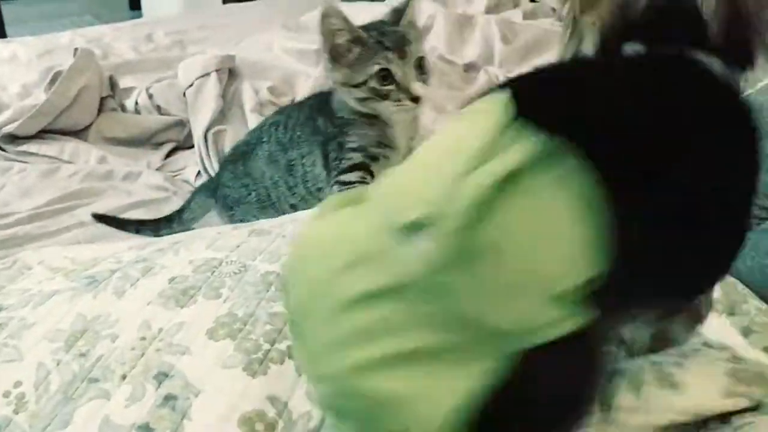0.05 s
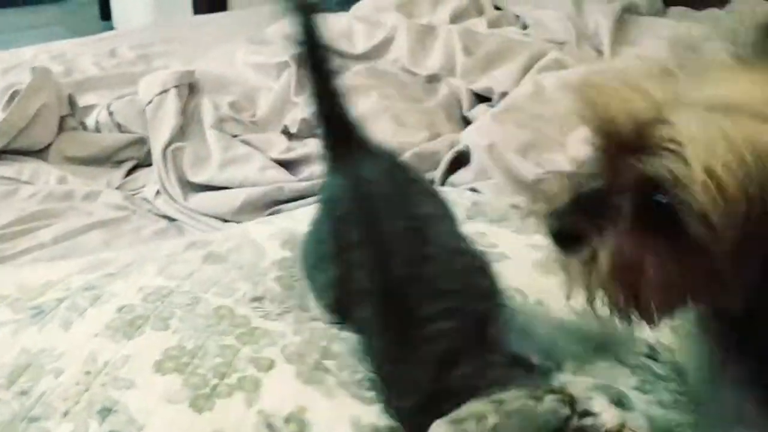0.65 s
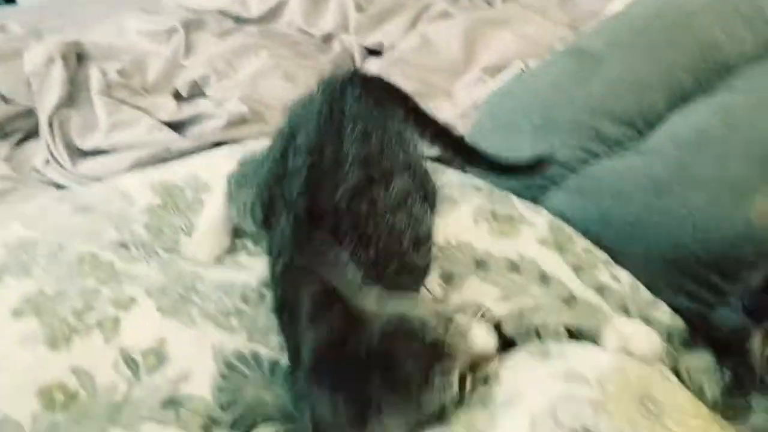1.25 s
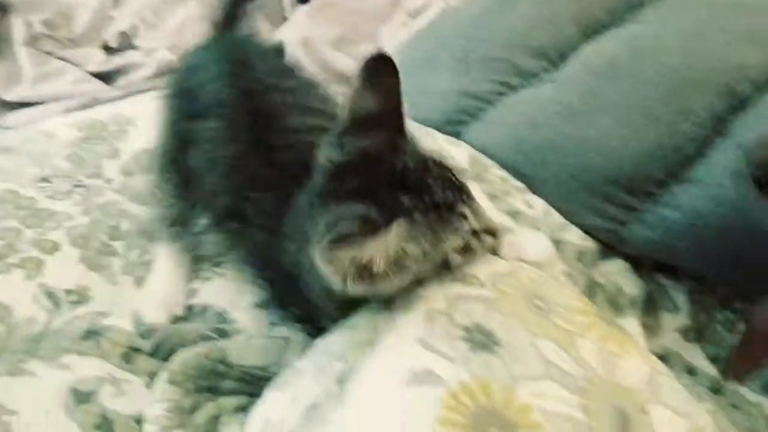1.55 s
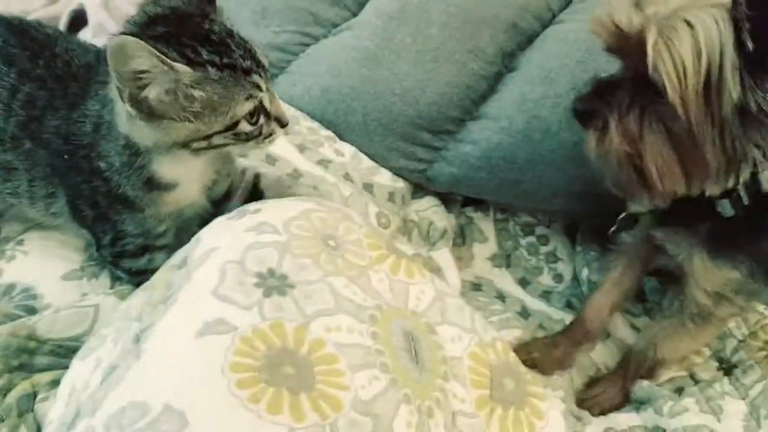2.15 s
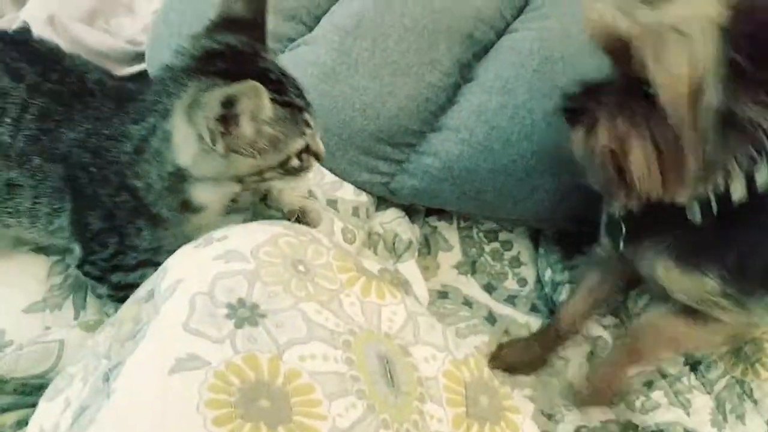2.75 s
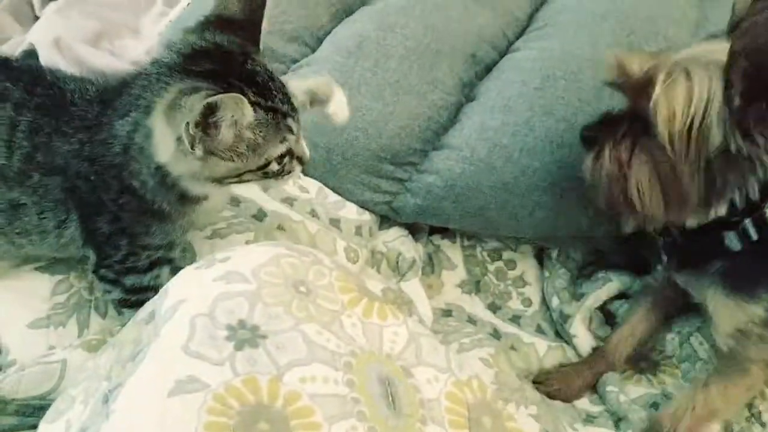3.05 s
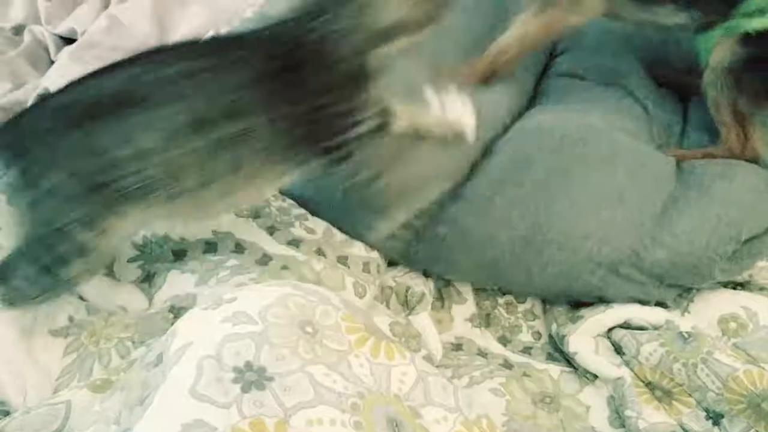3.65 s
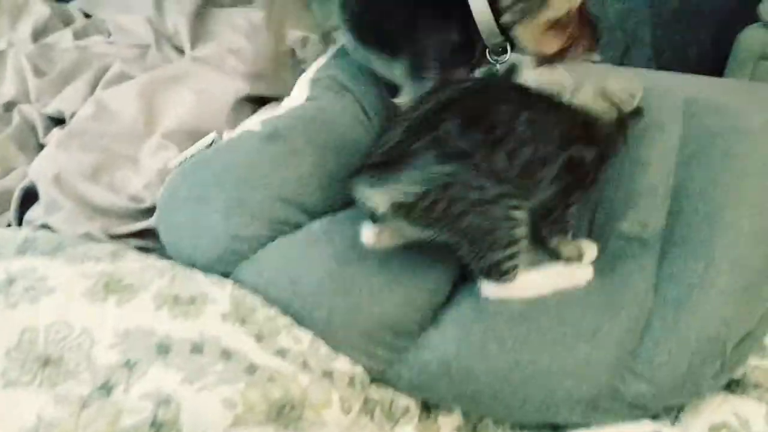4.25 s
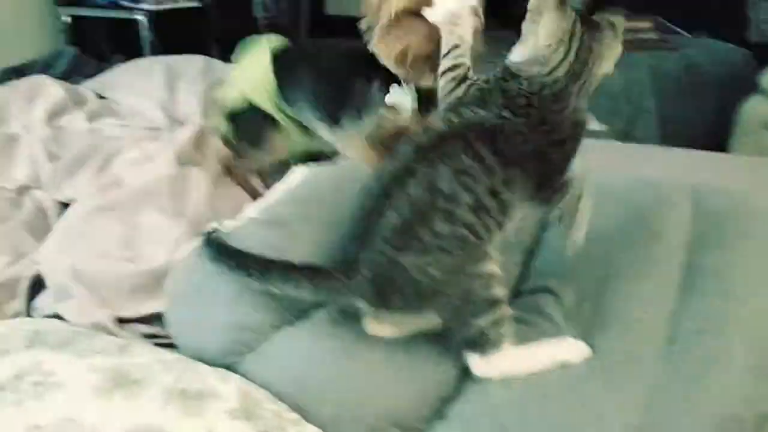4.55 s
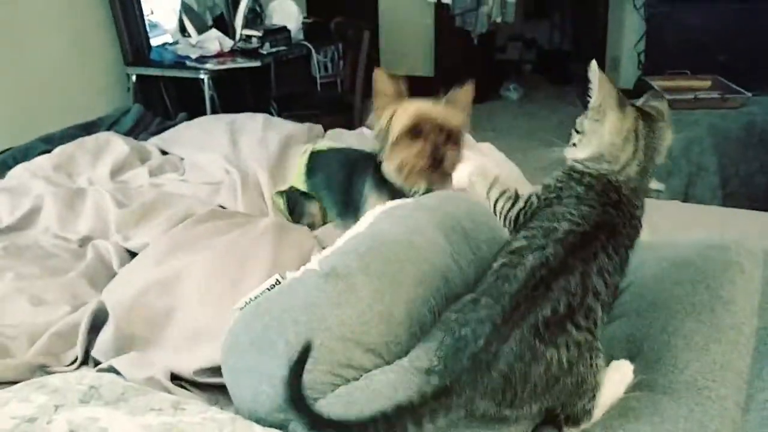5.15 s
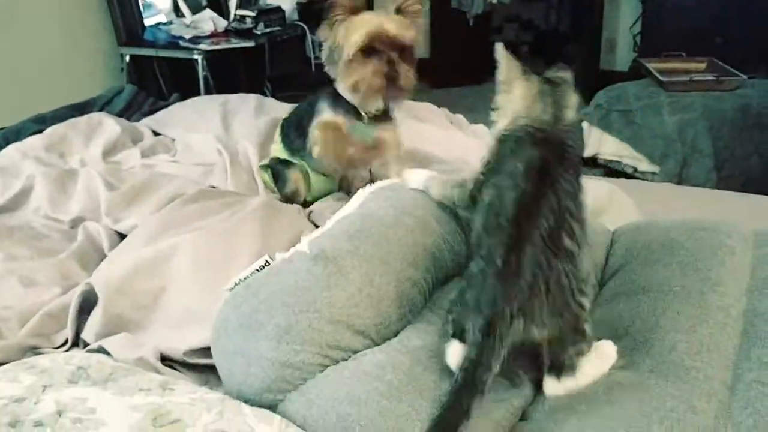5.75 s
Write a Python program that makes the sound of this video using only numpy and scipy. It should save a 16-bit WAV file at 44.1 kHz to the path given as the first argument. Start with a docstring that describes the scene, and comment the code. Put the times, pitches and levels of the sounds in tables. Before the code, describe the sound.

A small dog and a kitten scuffle on a quilt in a quiet bedroom, close to the microphone. Paws thump softly into the bedding, cloth swishes, and the metal tags on the dog's collar jingle with sharp little clicks. A lull of light steps and rustling follows over a faint hum. Then a second, longer flurry brings more thumps, swishes and jingles before the two settle.

```python
"""A bedroom, a phone's two microphones close to a small dog and a kitten on a quilt and padded pet bed.
They scuffle at once: paws thump into the bedding, cloth swishes, and the metal tags on the dog's collar
strike and jingle. From about 1.5 s comes a lull of light steps and rustling over the room's quiet hum.
Just after 3 s they lunge again, with more thumps, jingles and sharp clicks of the tags' split ring.
From 5 s they settle, with a last faint click and step."""
import sys
import numpy as np
from scipy import signal
from scipy.fft import rfft, irfft, next_fast_len
from scipy.io import wavfile
from scipy.ndimage import uniform_filter1d, map_coordinates

SR = 44100
rng = np.random.default_rng(int(sys.argv[2]) if len(sys.argv) > 2 else 0)


def inscribe(sig):
    """Save sig as 16-bit PCM at rate SR to the path in sys.argv[1].

    A 1-D sig is mono; a 2-D sig holds one channel per row.
    Samples are clipped to [-1, 1] before scaling.
    """
    pcm = np.round(np.clip(np.atleast_2d(sig).T, -1, 1) * 32767)
    wavfile.write(sys.argv[1], SR, pcm.astype(np.int16))


N = 264159

# The tags' three notes. Each row: mode frequency in Hz, level in dB, t60 in seconds.
LOW_MODES = [(5922, -2.5, .125), (8511, -13, .07), (9060, -15, .09)]
MIDDLE_MODES = [(6756, 0, .15), (6850, -19, .08), (15550, -21, .12)]
HIGH_MODES = [(12640, 0, .1), (12890, -16, .08), (10920, -23, .09), (15570, -22, .11)]
# Tags striking. Each row: start in seconds, low, middle and high note levels in dB,
# rattle length in seconds, left over right in dB.
TAG_CLINKS = [(.003, -58, -53.5, -49, .004, 0), (.149, -58, -52.5, -53, 0.0034, -2),
              (.164, -50.5, -56, -58, .003, 3), (.728, -62, -42, -41.5, .003, 3),
              (.749, -51, -37, -35.5, 0.024, 2.5), (.905, -45.5, -37.5, -56, 0.0022, 1),
              (1.0327, -48, -28, -34.5, 0.0067, 2), (1.07, -61, -35.5, -28, .028, 6),
              (1.121, -66, -37, -37.5, .022, 10.5), (1.1803, -50, -57, -42, .002, 1.5),
              (1.3088, -34, -45, -52, 0.0052, 0), (3.147, -39, -50, -40.5, .018, 1.5),
              (3.223, -70, -54, -32, 0.02, -5), (3.245, -70.5, -47, -19, .009, 1.5),
              (3.27, -37.5, -39, -26.5, .006, 4.5), (4.0195, -75, -65.5, -48, .003, 7),
              (4.064, -39.5, -54, -33.5, 0.011, 14), (4.32, -75, -70, -49.5, .003, 11),
              (4.41, -43, -68, -63, 0.024, 5), (4.825, -54, -43, -33, .004, 0),
              (4.834, -52, -39, -26, .008, 5), (4.8456, -49.5, -26.5, -29.5, .024, 5.5),
              (4.903, -36, -33, -38.5, .01, 6.5)]
# The split ring snapping, and claws catching. Each row: start in seconds, level in dB.
RING_SNAPS = [(0.7492, -16), (1.0694, -24), (1.1802, -26.5), (1.3089, -24), (3.1462, -30), (3.1632, -29),
              (3.2364, -19), (3.2514, -16), (3.3648, -39), (4.1101, -31.5), (4.6533, -34), (4.8174, -5.5),
              (4.8544, -14), (4.8668, -15.5), (5.8765, -38)]
CLAW_CATCHES = [(0.286, -57), (0.577, -30), (1.884, -49.5), (4.044, -44), (4.128, -33.5), (5.085, -45.5)]
# Paws landing. Each row: start in seconds, level in dB, relative slap level in dB.
PAW_LANDINGS = [(0.055, -39, -18), (0.11, -38, -17.5), (0.137, -32.5, -24.5), (0.175, -34.5, -28.5),
                (0.38, -27.5, -28), (0.554, -34.5, -18.5), (0.708, -27, -14.5), (0.723, -30, -9),
                (0.843, -27, -10), (0.918, -26, -22), (1.778, -43, -24.5), (2.781, -34.5, -20.5),
                (3.324, -27, -20), (3.45, -39.5, -15), (3.592, -34.5, -11), (3.693, -37.5, -23),
                (3.755, -36.5, -10), (3.833, -26.5, -16), (4.075, -29, -9), (4.127, -23.5, -6),
                (4.206, -33.5, -4.5), (4.274, -29.5, -9.5), (4.308, -30.5, -7), (4.533, -37.5, -6),
                (4.599, -33.5, -12.5), (4.893, -40.5, -5.5), (4.984, -35, -11.5), (5.936, -42, -7.5)]
# The padding's resonances. Each row: frequency in Hz, level in dB, t60 in seconds.
MATTRESS_MODES = [(61.5, -8.5, 0.23), (126.5, -2, 0.099), (180, -4, 0.088), (262.6, 0.5, 0.063),
                  (444.6, -9.5, 0.061)]
# Slides over cloth, brighter when faster. Each row: centre and half length in seconds,
# level and brightness in dB.
CLOTH_SLIDES = [(0.376, .035, -69, 4.5), (0.571, .03, -52.5, -6.5), (.674, 0.0098, -41, 10),
                (0.744, 0.021, -44.5, 3.5), (0.859, 0.02, -43, 4.5), (0.897, 0.023, -48, 14),
                (0.93, 0.0063, -40.5, 5.5), (0.997, 0.016, -63, 14.5), (1.45, 0.05, -65.5, -17),
                (2.8, .025, -64.5, -7), (3.232, 0.057, -63.5, 1), (3.302, 0.0072, -52, 2),
                (3.388, .03, -59, -10), (3.479, 0.018, -52, -5.5), (3.598, .01, -52, -6),
                (3.77, 0.0344, -44, -8.5), (3.853, 0.02, -43.5, -3.5), (3.939, 0.033, -47.5, -11),
                (4.089, .018, -40.5, -6.5), (4.19, 0.025, -49, 8), (4.275, 0.076, -47.5, -20.5),
                (4.498, 0.027, -63.5, 13), (4.569, 0.028, -55, -21), (4.767, 0.017, -52.5, -6.5),
                (4.965, 0.018, -50, 21), (5.2, 0.096, -70.5, 2.5)]
# Weight shifting on the bedding. Each row: time in seconds, heave level in dB, rustle level in dB.
WEIGHT_SHIFTS = [(0.0, -58, -62), (0.37, -63.5, -67), (0.6, -54.5, -56.5), (0.78, -61, -50),
                 (0.98, -57, -56.5), (1.22, -62.5, -67), (1.47, -64.5, -73.5), (2.08, -68, -66),
                 (2.45, -68.5, -83), (3.19, -71.5, -75.5), (3.32, -66, -49), (3.65, -63, -69),
                 (3.99, -56, -59), (4.27, -54.5, -54), (5.1, -63, -57.5), (5.32, -71.5, -71.5),
                 (5.79, -72, -75.5), (5.99, -63, -56)]
# Noise colours. Each row: frequency in Hz, relative spectral density in dB.
CLICK_SPECTRUM = [(2000, -49), (4500, -53.5), (6500, -23), (7800, -1), (8700, -6), (9500, 6),
                  (10700, -15.5), (14000, -9), (16500, -37.5)]  # split ring
CLACK_SPECTRUM = [(2500, -25), (4200, -2.5), (7000, -6), (11500, -2), (16000, -19)]  # edge of the large tag
SLAP_SPECTRUM = [(150, 5.5), (450, 1.5), (850, 5), (1300, -1), (2500, -14.5), (6000, -37), (15000, -41.5)]  # cover under a paw
CRUMPLE_SPECTRUM = [(200, -7.5), (450, -4.5), (900, -3), (1400, -4), (2600, -9), (4500, -33.5),
                    (10000, -54)]  # folds
SCRATCH_SPECTRUM = [(1500, -15.5), (3000, -8), (4300, 2.5), (5500, -3.5), (7000, -14.5), (12000, -28)]  # weave
FIZZ_SPECTRUM = [(4000, -15.5), (7000, -0.5), (9200, 7), (10800, -1), (14500, 0), (16000, -27)]  # fibres
HEAVE_SPECTRUM = [(40, -3), (90, 0.5), (220, -2.5), (400, -12), (800, -21), (2000, -67.5)]  # filling
AIR_SPECTRUM = [(20, -35), (45, 0.5), (70, 1), (95, -10.5), (125, -5.5), (180, -22.5), (300, -22),
                (500, -25.5), (1000, -32), (3000, -38.5), (9000, -38.5), (11000, -44.5), (16000, -43)]  # still room
# Mains hum. Each row: frequency in Hz, level in dB.
MAINS_TONES = [(59, -59), (120, -64.5)]
# The bedroom's decay. Each row: frequency in Hz, t60 in seconds.
ROOM_DECAY = [(150, 0.22), (2000, 0.25), (8000, 0.14), (16000, 0.12)]
# Likeness at the two microphones. Each row: frequency in Hz, correlation from 0 to 1.
MIC_LIKENESS = [(60, 0.86), (200, 0.91), (500, 0.6), (1000, 0.41), (2000, 0.28), (6000, 0.026)]

BOUNCE_GAP_S, BOUNCE_DB, BOUNCE_SCATTER_DB = .009, -9, 0.5  # bounces in a rattle, relative to the ringing
RESTRIKE_DB, RESTRIKE_RAD = 1.5, 1.2  # scale each bounce's throw of a note's level and phase
SETTLE_DB, SETTLE_S = -1.5, .008  # after a rattle the tags fall together and lose this much, this fast
PATTER_PER_S, PATTER_DB, PATTER_SLAP_DB = 6.3, 8.5, -16  # light steps: rate, level over heave, slap
SCRATCH_SHARE = 0.54  # the fizz gains all of a slide's brightness, the scratch this share


def collar_tags(ring_db, flutter_db, clack_db, chatter_db, chatter_t60, mic_phase_rad):
    """Each clink starts the metal tags afresh; bounces keep them ringing through the rattle, then they fade."""
    out, t = np.zeros((2, N)), np.arange(SR // 5) / SR
    next_starts = [row[0] for row in TAG_CLINKS[1:]] + [2 * N / SR]
    for (s, low, middle, high, rattle, pan), stop in zip(TAG_CLINKS, next_starts):
        ring, dying = np.zeros((2, len(t))), np.maximum(t - rattle, 0)
        gaps = BOUNCE_GAP_S * (.5 + rng.random(size=8))
        lags = np.cumsum(gaps) - gaps[0]
        bounce = np.searchsorted(lags, np.minimum(t, rattle), side="right") - 1
        settling = amp(SETTLE_DB * (1.5 - np.exp(-dying / SETTLE_S)))
        for modes, note_db in ((LOW_MODES, low), (MIDDLE_MODES, middle), (HIGH_MODES, high)):
            throws = rng.standard_normal((2, len(lags)))[:, bounce]
            knock, jump = uniform_filter1d(throws, size=40, axis=1)
            # the discs rub as they swing, which roughens the note
            flutter = grainy(rate=970, depth_db=flutter_db, size=len(t))
            gain = flutter * settling * amp(RESTRIKE_DB * knock)
            sway = .2 * wobble(rate=180, size=len(t)) + 0.23 * wobble(rate=2500, size=len(t))
            # a turning disc reaches the two microphones out of step, either way round
            skew = np.array([[.5], [-.5]]) * rng.choice([-1, 1]) * rng.normal(mic_phase_rad, 0.5)
            for hz, db, t60 in modes:
                phase = 2 * np.pi * (hz * t + rng.random()) + sway + RESTRIKE_RAD * jump + skew
                ring += amp(note_db + db + ring_db) * fade(dying, t60) * gain * np.sin(phase)
        until_next = np.clip((stop - s - t) / 0.0018 + 1, 0, 1) * np.clip(t / 0.00053, 0, 1)
        # a hard blow on the large tag starts its low note with a broad clack
        ticks = amp(low + clack_db) * fade(t, t60=0.016) * noise(CLACK_SPECTRUM, len(t))
        # loose metal bounces and buzzes in between, the more so the harder it rings
        swing = np.linalg.norm(amp([low, middle, high]))
        for lag in lags:
            click = ring_click(rng.normal(BOUNCE_DB, BOUNCE_SCATTER_DB), rise_s=0.00055)
            add(ticks, lag, (lag < rattle) * swing * click)
        buzz = amp(chatter_db) * swing * fade(dying, chatter_t60)
        chatter = buzz * grainy(rate=640, depth_db=4.5, size=len(t)) * noise(CLICK_SPECTRUM, len(t))
        add(out, s, panned(pan) * (ticks + until_next * (ring + chatter)))
    return out


def split_ring(click_db, rise_s, pan_db):
    """The ring snaps against its loop as the collar jerks."""
    out = np.zeros((2, N))
    for s, db in RING_SNAPS:
        add(out, s, ring_click(db + click_db, rise_s))
    return out * panned(pan_db)


def ring_click(db, rise_s, low_hz=5500):
    """One dry click of the ring, too small to radiate much below low_hz."""
    t = np.arange(SR // 50) / SR
    pulse = (t / rise_s) ** 2 * np.exp(2 - 2 * t / rise_s)
    burst = pulse * noise(CLICK_SPECTRUM, len(t))
    snap = filtered(burst, lambda hz: 1 / np.sqrt(1 + (low_hz / (hz + 1)) ** 8))
    return amp(db) * np.std(pulse) * unit(snap)


def paws(steps, thump_db, slap_db, slap_t60, settle_db, settle_t60, rise_s):
    """A paw thumps the damped mattress and slaps its cover, which then settles."""
    out, t = np.zeros((2, N)), np.arange(SR // 4) / SR
    for s, db, slap in steps:
        tuning = np.exp(rng.normal(0, 0.11))  # stiffness varies from spot to spot
        modes = sum((-1) ** k * amp(level) * fade(t, t60) * np.sin(2 * np.pi * hz * tuning * t)
                    for k, (hz, level, t60) in enumerate(MATTRESS_MODES))
        thump = amp(thump_db) * modes * (1 - np.exp(-t / rise_s))
        decay = fade(t, slap_t60) + amp(settle_db) * fade(t, settle_t60)
        cover = amp(slap + slap_db) * decay * noise(SLAP_SPECTRUM, len(t))
        add(out, s, amp(db) * (thump + cover))
    return out


def patter():
    """Rows for paws(): light steps at random moments, as heavy as the weight being shifted."""
    times, heave, _ = np.transpose(WEIGHT_SHIFTS)
    spacing, softness = rng.random(size=(60, 2)).T
    moments = np.cumsum(.5 + spacing) / PATTER_PER_S
    levels = np.interp(moments, times, heave) + PATTER_DB - 6 * softness
    return [(s, db, PATTER_SLAP_DB) for s, db in zip(moments, levels)]


def claws(t60):
    """A claw plucks a thread with a dry tick."""
    out, t = np.zeros((2, N)), np.arange(SR // 20) / SR
    spectrum = [(500, -5.0), (3000, 3), (9000, 0.5), (16000, -24)]  # Hz, dB
    for s, db in CLAW_CATCHES:
        add(out, s, amp(db) * fade(t, t60) * noise(spectrum, len(t)))
    return out


def slides(crumple_db, scratch_db, fizz_db, release_ratio):
    """Paws and fur slide over the cloth: folds crumple, the weave scratches and, at speed, fizzes."""
    t, power = np.arange(N) / SR, np.zeros((3, N))
    for s, half, db, bright in CLOTH_SLIDES:
        u = (t - s) / half
        swell = np.exp(-np.minimum(np.where(u < 0, u, u / release_ratio) ** 2, 50))
        levels = db + bright * np.array([[0], [SCRATCH_SHARE], [1]])
        power += amp(levels) ** 2 * swell
    crumple, scratch, fizz = np.sqrt(power)
    crumple *= grainy(rate=300, depth_db=3.5)
    folds = amp(crumple_db) * crumple * patchy(noise(CRUMPLE_SPECTRUM), depth_db=3)
    threads = amp(scratch_db) * scratch * patchy(noise(SCRATCH_SPECTRUM), depth_db=2)
    fibres = amp(fizz_db) * fizz * patchy(noise(FIZZ_SPECTRUM), depth_db=4.5)
    return folds + grainy(rate=980, depth_db=1.5) * (threads + fibres)


def bedding(heave_db, rustle_db, nap_db):
    """The filling heaves and the cover rustles softly as the animals shift their weight."""
    weight, shifting = curves(WEIGHT_SHIFTS)
    lumps = grainy(rate=40, depth_db=2.2)
    heave = amp(weight + heave_db) * lumps * noise(HEAVE_SPECTRUM)
    cover = noise(CRUMPLE_SPECTRUM) + amp(nap_db) * (noise(SCRATCH_SPECTRUM) + noise(FIZZ_SPECTRUM))
    catching = grainy(rate=20, depth_db=3.4) * grainy(rate=620, depth_db=1.5)
    return heave + amp(shifting + rustle_db) * catching * cover


def walls(x, delay_s):
    """The bedroom's short reverberation, its own at each microphone."""
    hz, t, z = signal.stft(rng.standard_normal((2, SR // 3)), SR, nperseg=256)
    tail = signal.istft(z * fade(t, along(ROOM_DECAY, hz)[:, None]), SR, nperseg=256)[1]
    tail = np.pad(tail / np.linalg.norm(tail[0]), ((0, 0), (round(delay_s * SR), 0)))
    return signal.fftconvolve(x.mean(0)[None], tail, axes=1)[:, :N]


def room_tone(air_db):
    """Soft rumble and hiss with a slightly unsteady mains hum."""
    t = np.arange(N) / SR
    hum = sum(amp(db + 1.5 * wobble(1.3)) * np.sin(2 * np.pi * hz * t + 0.21 * wobble(1.5))
              for hz, db in MAINS_TONES)
    return amp(air_db) * noise(AIR_SPECTRUM) + hum


def noise(spectrum, size=N):
    """Stereo noise of rms 1, alike at both microphones in the bass and unrelated in the treble."""
    def response(hz):
        turn = np.arccos(np.clip(along(MIC_LIKENESS, hz), -1, 1)) / 2
        return amp(along(spectrum, hz)) * [np.cos(turn), np.sin(turn)]
    mid, side = filtered(rng.standard_normal((2, size)), response)
    return unit(np.array([mid + side, mid - side]))


def patchy(x, depth_db):
    """Each fold of cloth has its own passing colour."""
    z = signal.stft(x, nperseg=512)[2]
    field = uniform_filter1d(rng.standard_normal(z.shape[1:]), size=4, axis=0)
    field = uniform_filter1d(field, size=7, axis=1)
    return unit(signal.istft(z * amp(depth_db * unit(field)), nperseg=512)[1][:, :N])


def grainy(rate, depth_db, size=N):
    """Surfaces catch and let go: a fast random gain of rms 1."""
    return unit(amp(depth_db * wobble(rate, size)))


def wobble(rate, size=N):
    """A smooth random curve, rate knots a second."""
    knots = rng.standard_normal(int(size * rate / SR) + 4)
    return map_coordinates(knots, [np.arange(size) * rate / SR])


def panned(db):
    """Gains for left over right in dB, at most what the phone's body can shade."""
    db = np.clip(db, -14, 14)
    return unit(amp([[db / 2], [-db / 2]]))


def fade(t, t60):
    """Free decay by 60 dB in t60 seconds."""
    return np.exp(-np.log(1000) * t / t60)


def filtered(x, response):
    """x through a frequency response."""
    n = x.shape[-1]
    m = next_fast_len(n + 4096)
    return irfft(rfft(x, m) * response(np.fft.rfftfreq(m, 1 / SR)), m)[..., :n]


def along(points, hz):
    """(Hz, value) points read on a log axis."""
    f, v = np.transpose(points)
    return np.interp(np.log(hz + 1), np.log(f + 1), v)


def curves(rows):
    """One value per sample for each column after the time."""
    s, *cols = np.transpose(rows)
    return [np.interp(np.arange(N) / SR, s, c) for c in cols]


def add(track, s, sound):
    """Mix a sound into a track at time s."""
    part = track[:, max(round(s * SR), 0):][:, :sound.shape[-1]]
    part += sound[..., :part.shape[-1]]


def amp(db):
    """Decibels to gain."""
    return 10 ** (np.asarray(db) / 20)


def unit(x):
    """x at rms 1."""
    return x / np.sqrt(np.mean(x ** 2) + 1e-20)


def scene():
    """Collar, paws and cloth close up, mostly a little to the left, with the bedroom behind."""
    collar = collar_tags(ring_db=3.0, flutter_db=2.0, clack_db=1.5, chatter_db=-19.0,
                         chatter_t60=0.12, mic_phase_rad=1.54)
    collar += split_ring(click_db=-2, rise_s=0.00063, pan_db=4.5)
    cloth = paws(list(PAW_LANDINGS) + patter(), thump_db=-4.5, slap_db=3, slap_t60=0.063,
                 settle_db=-17.5, settle_t60=0.19, rise_s=0.00048)
    cloth += claws(t60=0.0072)
    cloth += slides(crumple_db=-0.5, scratch_db=0.0, fizz_db=-0.9, release_ratio=1.11)
    cloth += bedding(heave_db=2.5, rustle_db=-6.0, nap_db=-1.0)
    bed_and_room = cloth + amp(-10.5) * walls(cloth, delay_s=.006) + room_tone(air_db=-57)
    return collar + amp(-5) * walls(collar, delay_s=0.0036) + bed_and_room * panned(db=2.0)


def record(dry):
    """The phone rounds off the sharpest peaks, sheds the deepest bass and keeps nothing above top_hz."""
    ceiling, low_cut_hz, top_hz = .8, 30, 16300
    rounded = dry / (1 + (dry / ceiling) ** 4) ** (1 / 4)
    return filtered(rounded, lambda hz: (1j * hz / (low_cut_hz + 1j * hz)) ** 2 * (hz < top_hz))


dry = scene()
out = record(dry)
inscribe(out)
```